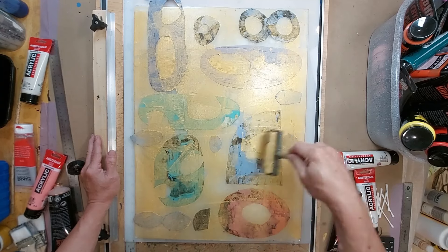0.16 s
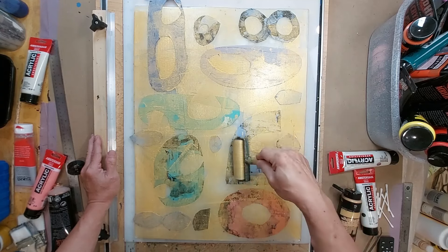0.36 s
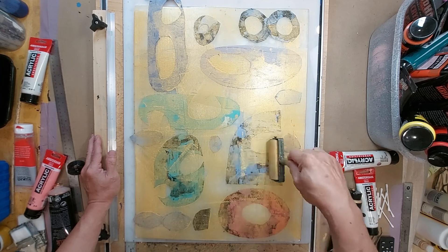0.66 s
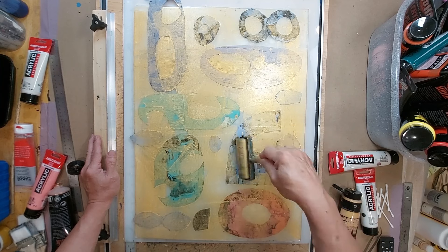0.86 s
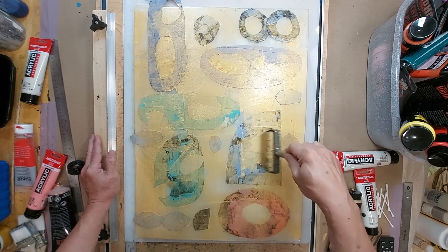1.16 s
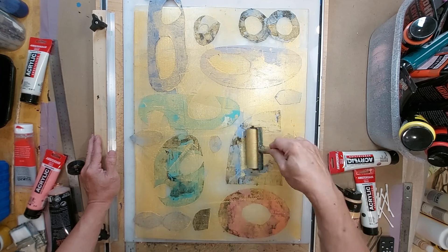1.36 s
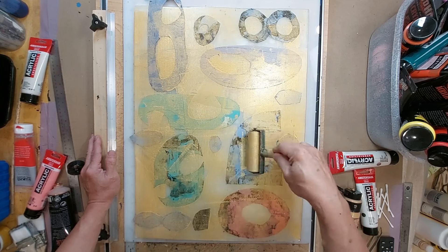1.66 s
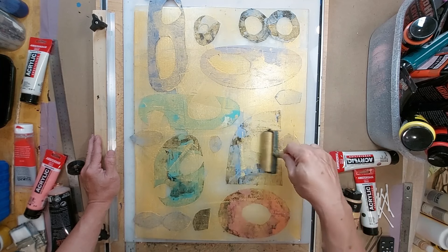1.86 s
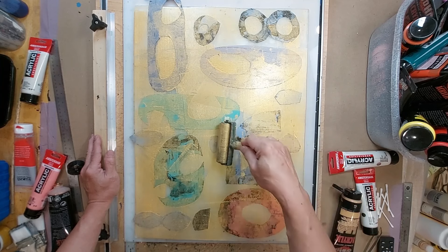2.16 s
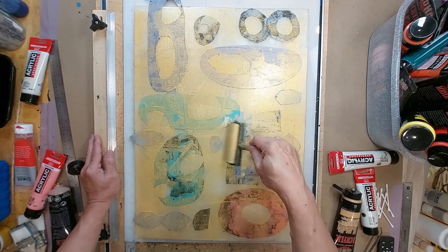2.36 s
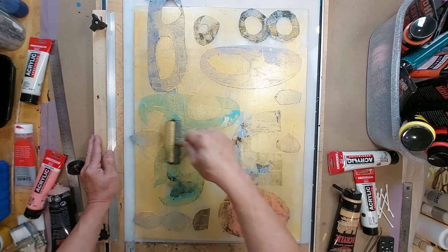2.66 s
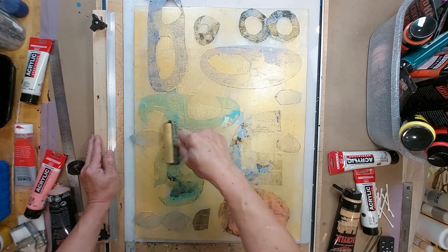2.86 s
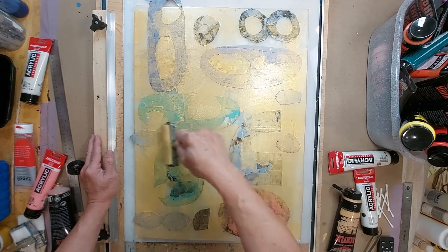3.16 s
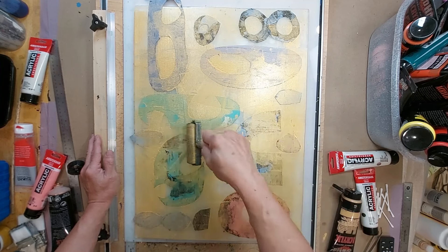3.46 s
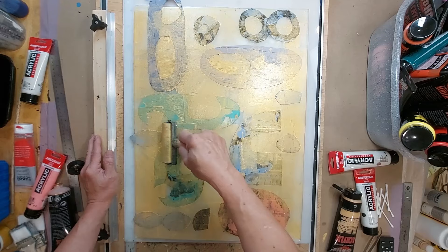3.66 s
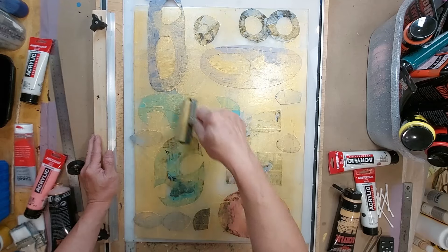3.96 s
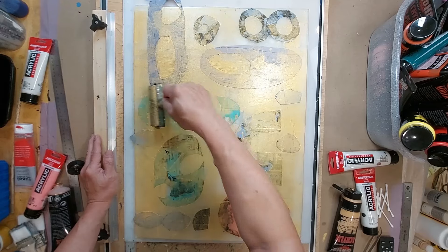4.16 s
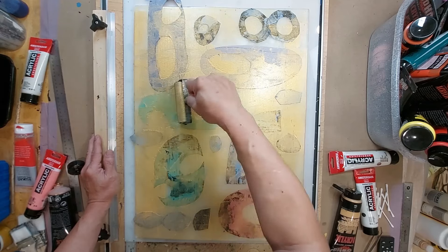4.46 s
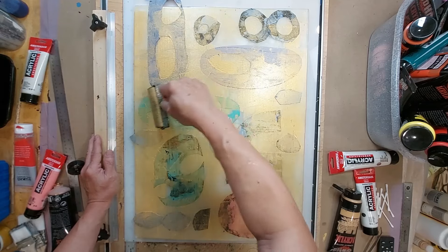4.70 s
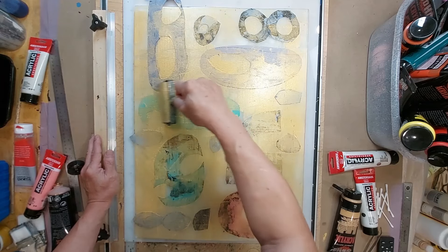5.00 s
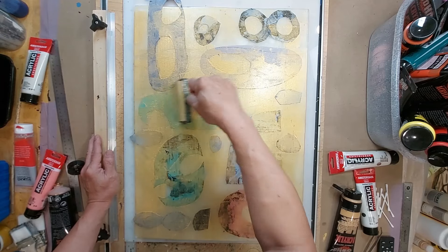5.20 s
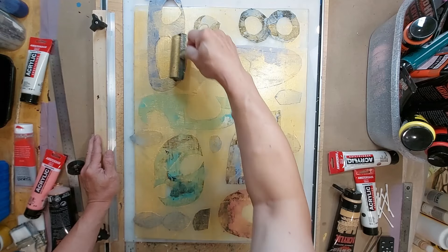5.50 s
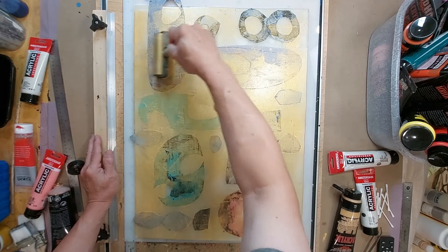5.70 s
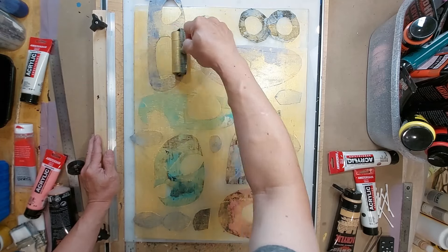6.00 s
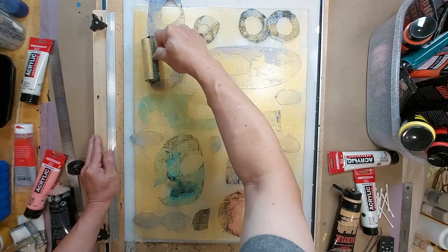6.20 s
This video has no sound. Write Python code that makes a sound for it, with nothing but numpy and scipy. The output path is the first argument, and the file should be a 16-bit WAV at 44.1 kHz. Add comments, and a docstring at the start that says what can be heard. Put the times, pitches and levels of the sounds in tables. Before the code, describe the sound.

A rubber hand roller moves back and forth over tacky paint on a work table for about six seconds. Each short stroke swells and fades with a soft, low rumble, faint ticking and a fine, sticky hiss. At the turns the drum clacks in its loose frame, sometimes with a dull thump on the table.

For the first three seconds the clacks come thick and uneven, the sharpest near 1.0, 1.4 and 1.8 seconds, with another cluster at 2.3. From 3 to 3.8 seconds the rolling is gentler, with only faint ticks. A few clacks return around 3.9 to 4.2 seconds. A firmer stroke and a bright clack come at 5.3, then a knock and a thump at 5.6. The last strokes are light and more hissy. The small, bare studio rings briefly after each knock, over a faint, low room tone.

```python
"""Hand roller on tacky paint

A roller is pushed back and forth over acrylic paint on a work table in a small studio. The rubber drum
rumbles on the table and hisses as the paint film splits behind it. At the turns, and when it is lifted
or set down, the drum clacks in its loose frame and thumps the table; the bare room rings on after each."""
import sys
import numpy as np
from scipy import signal
from scipy.fft import rfft, irfft
from scipy.io import wavfile

SR = 44100
rng = np.random.default_rng(int(sys.argv[2]) if len(sys.argv) > 2 else 0)


def store_pcm(level_fs):
    """Save levels as 16-bit WAV."""
    pcm = np.round(np.clip(level_fs, -1, 1) * 32767).astype(np.int16)
    wavfile.write(sys.argv[1], SR, np.atleast_2d(pcm).T)


N = 279594
TIME = np.arange(N) / SR

# modes of the roller's handle: pitch_hz, bandwidth_hz, level_db
HANDLE_MODES = [(298, 56, 0.5), (541, 94, -2.5), (863, 220, 2), (1118, 140, -0.5)]
# modes of the frame that holds the drum: pitch_hz, bandwidth_hz, level_db
FRAME_MODES = [(1330, 300, -6), (1690, 130, 0), (1880, 170, -2), (2160, 180, 0), (2380, 240, -3),
               (2630, 260, -1), (3100, 360, -1), (3450, 240, 1), (4030, 300, -3)]


def from_db(db):
    """Amplitude ratio of a level in decibels."""
    return 10 ** (np.asarray(db) / 20)


def rms_one(x):
    """Normalisation to unit rms."""
    return x / np.sqrt(np.mean(x ** 2) + 1e-20)


def at_hz(points, hz):
    """Interpolation of a curve on a logarithmic frequency axis."""
    freqs, values = np.transpose(points)
    return np.interp(np.log(np.maximum(hz, 1)), np.log(freqs), values)


def octaves(modes, hz):
    """Interval of each mode above a frequency, in octaves."""
    return np.log2(np.array(modes)[:, 0] / hz)


def coloured(x, spectrum):
    """Spectral shaping of a steady texture, at unit rms."""
    gain = from_db(at_hz(spectrum, np.fft.rfftfreq(N, 1 / SR)))
    return rms_one(irfft(rfft(x) * gain, N))


def drift(rate_hz):
    """Random modulation: straight lines between Gaussian values."""
    knots = rng.standard_normal(N // 40)
    return np.interp(TIME * rate_hz, np.arange(len(knots)), knots)


def add(out, start_s, sound):
    """Superposition of a sound at a given time."""
    start = max(round(start_s * SR), 0)
    out[start:start + len(sound)] += sound[:N - start]


def grains(per_s, spread_db):
    """Shot noise: tiny snaps of uneven size at random times."""
    sizes = from_db(spread_db * np.minimum(rng.exponential(1, N), 4)) * rng.standard_normal(N)
    return sizes * (rng.random(N) < per_s / SR)


def resonate(x, hz, bandwidth_hz):
    """A damped oscillator: two poles, unit gain at the peak."""
    radius = np.exp(-np.pi * bandwidth_hz / SR)
    feedback = [1, -2 * radius * np.cos(2 * np.pi * hz / SR), radius ** 2]
    return signal.lfilter(np.array([1, 0, -1]) * (1 - radius ** 2) / 2, feedback, x + 1e-18)


def strike(force, modes, lift_db=0, vary_db=2.08):
    """Modal superposition: a force excites each mode in a varying share; energy of 5 ms at unit rms."""
    freqs, widths, levels = np.transpose(modes)
    shares = from_db(levels + lift_db + vary_db * rng.standard_normal(len(modes)))
    ring = sum((-1) ** k * shares[k] * resonate(force, freqs[k], widths[k]) for k in range(len(modes)))
    return ring / np.sqrt(np.sum(ring ** 2) / (.005 * SR))


def rattle(length_s, first_boost=0.67, bounce=.55):
    """Rebound: one sharp contact, then smaller ones, spread by all-pass filters to keep the colour even."""
    force = signal.unit_impulse(4096)
    for share in np.geomspace(.08, .24, 3) * rng.uniform(.7, 1.3, 3):
        feedback = np.zeros(int(share * np.clip(length_s, .001, .02) * SR) + 2)
        feedback[[0, -1]] = 1, bounce * rng.choice([-1, 1])
        force = signal.lfilter(feedback[::-1], feedback, force)
    force[0] += first_boost * np.sign(force[0])
    return force


def room_tone(level_db=-65.5):
    """Ambient noise: the steady quiet of the studio, strongest in the bass."""
    # noise spectrum: frequency_hz, relative_db
    spectrum = [(25, -20), (60, -2), (120, 9), (220, 1.5), (450, -1), (800, -5), (1500, -10.5),
                (4000, -14.5), (16000, -17.5)]
    return from_db(level_db) * coloured(rng.standard_normal(N), spectrum)


def reverberation(x, gap_s=.0045, build_s=0.00067):
    """Diffuse field: wall echoes build up after a short gap and decay exponentially, treble first."""
    # reverberation time of the studio: frequency_hz, t60_s
    decay_times = [(100, 2.2), (400, 0.95), (1000, 0.3), (3000, 0.28), (8000, 0.24), (16000, 0.23)]
    # echo strength relative to the direct sound: frequency_hz, level_db
    echo_levels = [(100, -9.5), (500, -3.5), (1500, -6.5), (3300, -2.5), (8000, 1.5), (16000, 2)]
    t = TIME[:SR // 2]
    late = np.maximum(t - gap_s, 0)
    white, hz = rfft(rng.standard_normal(len(t))), np.fft.rfftfreq(len(t), 1 / SR)
    edges_hz = np.geomspace(40, 18000, 16)
    response = 0
    for low, high in zip(edges_hz, edges_hz[1:]):
        centre = np.sqrt(low * high)
        fade = (1 - np.exp(-late / build_s)) * from_db(-60 * late / at_hz(decay_times, centre))
        band = irfft(white * ((hz >= low) & (hz < high)), len(t))
        response += from_db(at_hz(echo_levels, centre)) * band * fade / np.sqrt(np.sum(fade ** 2))
    return signal.fftconvolve(x, response)[:N]


def stroke_envelopes(rise_db_per_s=255, fall_db_per_s=171):
    """Amplitude follows speed: each stroke swells, holds and runs out, and the strongest leads."""
    # pushes and pulls, with the paint's hiss relative to the rumble: centre_s, hold_s, level_db, tack_db
    strokes = [(.09, 0.15, -50.5, -10), (.34, 0.04, -51.5, -16), (0.459, 0.091, -48.5, -11),
               (.73, 0.12, -55, -6.5), (.97, 0.17, -50.5, -18), (1.161, 0.084, -49, -14),
               (1.32, .03, -57.5, -16), (1.421, 0.068, -50, -17), (1.598, .03, -48, -4),
               (1.851, 0.1, -50, -9), (2.108, 0.047, -52.5, -21), (2.31, 0.055, -49, -12),
               (2.44, 0.023, -47.5, -10), (2.608, 0.037, -51.5, -15), (2.9, 0.16, -51.5, -13),
               (3.188, 0.084, -60, -10.5), (3.381, 0.036, -54.5, -8), (3.601, 0.046, -58.5, -11.5),
               (3.9, 0.036, -49.5, -9.5), (4.01, .03, -52.5, -11), (4.21, 0.076, -53.5, -6),
               (4.418, 0.024, -51.5, -6), (4.635, 0.015, -55, -1), (4.811, .05, -55, -4),
               (5.059, 0.037, -64, -3.5), (5.288, 0.044, -46, -12), (5.63, 0.059, -52.5, -12),
               (5.785, .04, -59.5, 1), (5.95, 0.088, -59, -4.5), (6.02, 0.0194, -61, 6.5),
               (6.109, 0.047, -59.5, 3), (6.21, .02, -59.5, 2.5), (6.335, .02, -59.5, 3.5)]
    effort, tack = np.zeros(N), np.zeros(N)
    for centre_s, hold_s, level_db, tack_db in strokes:
        before_s = np.maximum(centre_s - hold_s / 2 - TIME, 0)
        after_s = np.maximum(TIME - centre_s - hold_s / 2, 0)
        swell = from_db(level_db - rise_db_per_s * before_s - fall_db_per_s * after_s)
        effort = np.maximum(effort, swell)
        tack = np.maximum(tack, swell * from_db(tack_db))
    return effort, tack


def drum_rumble(effort, gain_db=-0.5, bumpy_db=3.0):
    """Rolling noise: the drum's uneven contact with the table makes a low, fluctuating rumble."""
    # rumble spectrum: frequency_hz, relative_db
    spectrum = [(25, -13.5), (45, -6), (62, 3), (85, -5.5), (120, 4), (170, -2), (250, -3), (500, -3.5),
                (720, -10.5), (1100, -11), (2000, -11.5), (3000, -16), (6000, -21)]
    bumps = from_db(gain_db + bumpy_db * drift(60))
    return effort * bumps * coloured(rng.standard_normal(N), spectrum)


def frame_chatter(effort, gain_db=-16.0, slope_db_per_octave=-11.0, exponent=0.84):
    """Random excitation: light touches of the rolling drum ring mostly the frame's low modes."""
    tilt_db = slope_db_per_octave * octaves(FRAME_MODES, FRAME_MODES[0][0])
    chatter = rms_one(strike(grains(per_s=35, spread_db=0.5), FRAME_MODES, tilt_db))
    shaking = effort.mean() * (effort / effort.mean()) ** exponent   # even gentle rolling ticks
    return from_db(gain_db) * shaking * chatter


def paint_hiss(tack, gain_db=-3.0, patchy_db=2.5):
    """Film splitting: threads of paint snap behind the drum so densely that they merge into a hiss."""
    # spectrum of the snapping threads: frequency_hz, relative_db
    spectrum = [(1000, 9.5), (2000, -38), (3300, -4.5), (5000, 0), (7000, 5.5), (9500, 7.5), (13000, 6),
                (16000, -1)]
    patches = from_db(gain_db + patchy_db * drift(98))
    return tack * patches * coloured(grains(per_s=9000, spread_db=3.0), spectrum)


def table_thumps(contact_s=0.0031, jolt_s=0.004):
    """Soft impact: the rubber's rounded push drives the table's low modes; the jolt knocks the handle."""
    # the drum landing or bumping on the table: start_s, table_db, handle_db
    landings = [(0.127, -48, -68), (0.405, -44, -44), (0.489, -37.5, -48), (0.951, -38, -37),
                (1.4095, -35.5, -40.5), (1.797, -40.5, -34.5), (2.285, -57, -40), (2.423, -45, -67),
                (2.603, -53, -44.5), (2.835, -61, -40), (2.947, -59, -44), (3.371, -55, -46),
                (4.616, -49, -58), (5.62, -36, -36.5), (5.957, -44, -57)]
    # modes of the table top: pitch_hz, bandwidth_hz, level_db
    table_modes = [(61, 20, -18), (81, 16, -6), (116, 16, 0.5), (175, 25, 0.5), (231, 28, -5.5)]
    out, t = np.zeros(N), TIME[:8192]
    push = t * np.exp(-t / contact_s)
    for start_s, table_db, handle_db in landings:
        add(out, start_s, from_db(table_db) * strike(push, table_modes))
        add(out, start_s, from_db(handle_db) * strike(rattle(jolt_s), HANDLE_MODES))
    return out


def drum_clacks(full_db=-20, soft_db=-39, snap_s=0.0042, spot_db=6.5, spot_octaves=.17):
    """Hard impact: one rattle rings handle, frame and axle; harder, shorter contacts sound brighter."""
    # knocks in the frame, the struck spot favouring modes near one pitch: start_s, rattle_s, frame_db, spot_hz
    knocks = [(0.139, .008, -42, 3420), (0.3248, .003, -33, 1960), (0.4062, 0.0052, -33, 1600),
              (0.4135, 0.0022, -41, 3900), (0.439, .006, -31.5, 3600), (0.491, .0024, -42.5, 1670),
              (0.698, .003, -39, 1790), (0.715, 0.0038, -44.5, 1930), (0.811, 0.0083, -44.5, 1580),
              (0.898, .003, -39.5, 2650), (0.9507, .0026, -20, 1780), (1.134, .004, -43, 1280),
              (1.1529, .003, -26, 2000), (1.159, .0044, -27.5, 3320), (1.4109, .0033, -23.5, 3800),
              (1.575, .006, -27.5, 1990), (1.797, .003, -21, 2400), (1.806, .0044, -31.5, 2920),
              (1.854, .0047, -29, 2020), (2.021, 0.0058, -49, 1965), (2.105, .0034, -37.5, 1400),
              (2.2842, .0045, -27.5, 1550), (2.319, .003, -38, 1890), (2.323, .0065, -28, 1940),
              (2.443, .013, -37.5, 1540), (2.604, 0.0041, -37, 1400), (2.83, .007, -35.5, 2100),
              (2.841, .003, -38.5, 2200), (2.874, .004, -38.5, 3620), (2.925, .002, -43, 2200),
              (3.165, 0.0062, -55.5, 1390), (3.37, .002, -47, 2200), (3.529, 0.0033, -58, 1800),
              (3.589, 0.0045, -57.5, 2100), (3.618, 0.0041, -63, 1600), (3.87, .014, -44, 3270),
              (3.894, .0025, -32.5, 2200), (4.01, .005, -36.5, 1800), (4.188, 0.0016, -33.5, 2100),
              (4.238, .006, -41.5, 3270), (4.411, .004, -48, 2130), (5.259, .0047, -40, 1880),
              (5.275, .004, -24.5, 3320), (5.62, .008, -32, 2360), (5.638, .004, -40, 2500)]
    # modes of the axle: pitch_hz, bandwidth_hz, level_db
    axle_modes = [(4690, 880, -1), (5820, 760, -1), (6055, 230, 4.5), (7100, 850, -1.5), (7860, 200, 4),
                  (8400, 700, -2), (9780, 1100, -7), (10600, 420, -2.5), (12060, 2200, -8.5),
                  (14930, 640, -10.5)]
    axle_band = signal.butter(2, 4200, "high", fs=SR, output="sos")
    frame_band = signal.butter(2, [1100, 5000], "band", fs=SR, output="sos")
    out = np.zeros(N)
    for start_s, rattle_s, frame_db, spot_hz in knocks:
        force = rattle(rattle_s)
        handle_db = -36.5 + 0.85 * (frame_db - full_db)
        axle_db = -20.5 + 1.216 * (frame_db - full_db)
        handle_lift, frame_lift = (spot_db * np.exp(-(octaves(modes, spot_hz) / spot_octaves) ** 2)
                                   for modes in (HANDLE_MODES, FRAME_MODES))
        # slopes in dB per octave: soft contacts lose treble, and so does the axle in a drawn-out rattle
        frame_slope = 0.72 * min(frame_db - soft_db, 0)
        axle_slope = 0.93 * np.clip(axle_db - frame_db + 2, -10, 2) - 899.5 * max(rattle_s - snap_s, 0)
        frame_lift += frame_slope * octaves(FRAME_MODES, spot_hz)
        axle_lift = axle_slope * octaves(axle_modes, spot_hz)
        frame = from_db(frame_db) * strike(signal.sosfilt(frame_band, force), FRAME_MODES, frame_lift)
        axle = from_db(axle_db) * strike(signal.sosfilt(axle_band, force), axle_modes, axle_lift)
        handle = from_db(handle_db) * strike(force, HANDLE_MODES, handle_lift)
        add(out, start_s, handle + frame + axle)
    return out


def scene():
    """Superposition of the impacts, their echoes, the rolling drum and the room tone, in mono."""
    impacts = drum_clacks() + table_thumps()
    background = room_tone()
    echoes = reverberation(impacts)
    effort, tack = stroke_envelopes()
    rolling = drum_rumble(effort) + frame_chatter(effort) + paint_hiss(tack)
    return (background + echoes + rolling + impacts)[None]


def record(dry):
    """Band limiting: the microphone sheds the deepest bass, and the top is cut steeply."""
    bass_cut = signal.butter(2, 42, "high", fs=SR, output="sos")
    treble_cut = signal.ellip(10, .2, 80, 15900, fs=SR, output="sos")
    return signal.sosfilt(treble_cut, signal.sosfilt(bass_cut, dry))


dry = scene()
out = record(dry)
store_pcm(out)
```